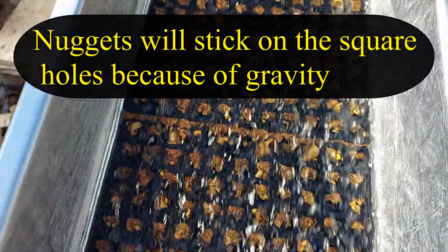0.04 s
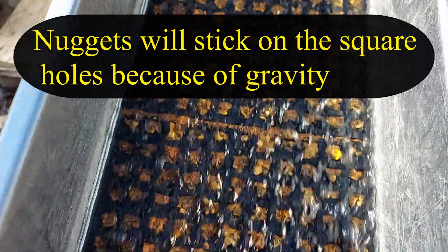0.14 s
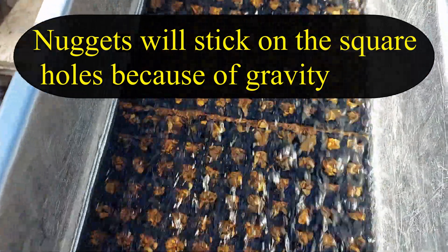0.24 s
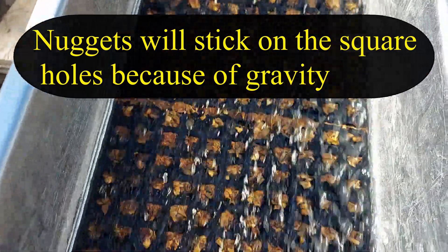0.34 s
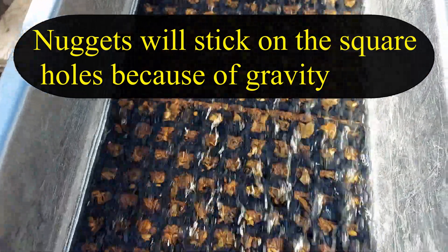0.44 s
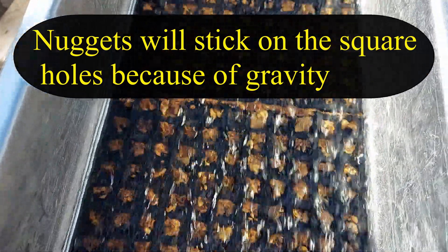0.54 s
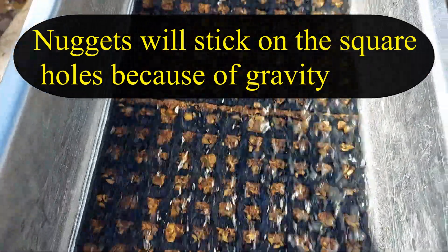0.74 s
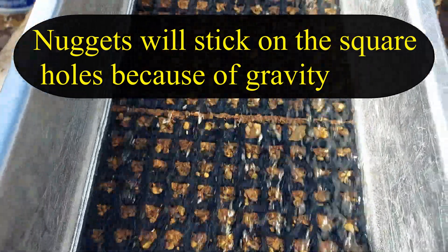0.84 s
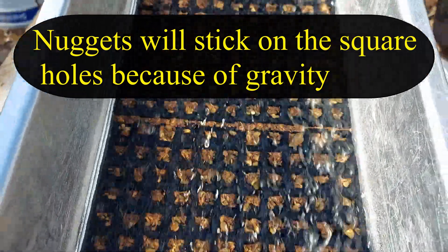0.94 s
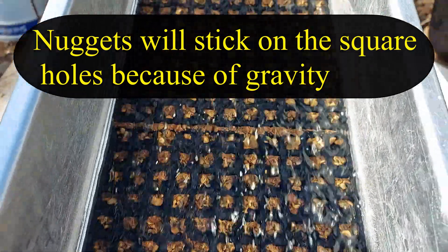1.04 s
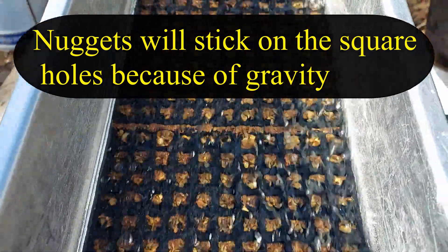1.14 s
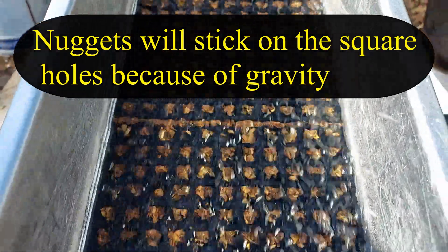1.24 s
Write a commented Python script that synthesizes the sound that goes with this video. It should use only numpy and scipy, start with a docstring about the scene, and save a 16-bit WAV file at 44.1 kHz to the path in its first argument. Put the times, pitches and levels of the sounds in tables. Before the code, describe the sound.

Running water babbles through a metal sluice outdoors, close to the microphone, with fine spray and small gurgles. Early on, the sluice takes a single dull knock, followed by a brief gravel clatter and low rattle under the continuing flow.

```python
"""One dull knock excites the damped modes of a metal sluice, which ring briefly. Grit crunches at the
contact, jolted gravel clatters, and a low rattle and a soft hiss die away. Throughout, shallow water
runs close by over the sluice's gravel-filled mat: a mass of small resonating bubbles, fine spray,
brief splashes and a few larger gurgles."""
import sys
import numpy as np
from scipy import signal
from scipy.fft import rfft, irfft
from scipy.io import wavfile
from scipy.ndimage import uniform_filter1d

SR = 44100
rng = np.random.default_rng(int(sys.argv[2]) if len(sys.argv) > 2 else 0)


def transcribe(u):
    """Save the signal u as a 16-bit wav file named by the first command-line argument.

    u: samples, shape (n,) or (channels, n), limited to [-1, 1]; the rate is SR.
    q: integer samples, one column per channel.
    """
    v = np.clip(np.atleast_2d(u).T, -1, 1)
    q = np.round(v * 32767).astype(np.int16)
    wavfile.write(sys.argv[1], SR, q)


N = 57330

# Strength of the flow. Each row: time in seconds, gain of the babble in dB.
FLOW_LEVEL = [(0, 0), (.13, 0.5), (.23, 1.5), (.36, 4.5), (.46, 1), (.52, -2.5), (.6, 1), (.68, -2),
              (.71, 2), (.76, -4), (.81, -2.5), (.9, -2), (1.02, -0.5), (1.08, -0.5), (1.16, 1.5),
              (1.24, 1), (1.3, -0.5)]
# Strength of the water's treble. Each row: time in seconds, gain in dB.
FIZZ_LEVEL = [(0, 0.5), (.2, 1.5), (.46, 2.5), (.54, 1.5), (.7, -.5), (.77, -2), (.9, -1.5), (1.05, 0),
              (1.19, -1), (1.3, -2)]
# Shift of the fizz from right to middle. Each row: time in seconds, added left minus right in dB.
FIZZ_PAN = [(0, 1.5), (.45, 0.5), (.6, 3.7), (.9, 4.2), (1.3, 4.2)]
# Running water. Each row: frequency in Hz, relative spectral density in dB.
WATER_SPECTRUM = [(25, -36), (50, -21), (90, -6.5), (130, -10.5), (200, -11), (270, -5.5), (410, -5.5),
                  (590, -8), (760, -3.5), (850, -0.5), (950, -4.5), (1250, -3), (1750, -1.5), (2700, -11),
                  (4100, -10), (5200, -15.5), (7900, -16), (9400, -22), (12000, -18.5), (16000, -24.5)]
# Direction of the water. Each row: frequency in Hz, left minus right in dB.
WATER_BALANCE = [(100, 1.5), (500, 3.5), (1200, 3), (1550, 2.5), (2400, -1.5), (4500, -4), (7700, -7),
                 (9500, 1.5), (12000, 2), (15000, -3)]
# Likeness of the two sides. Each row: frequency in Hz, correlation from -1 to 1.
STEREO_CORRELATION = [(100, .9), (800, 0.77), (1150, 0.42), (1550, -0.24), (2300, 0.21), (6000, -0.11)]
# Larger bubbles. Each row: start in seconds, initial pitch in Hz, level in dB, T60 in seconds.
GURGLE_BUBBLES = [(.015, 868, -37, 0.15), (.018, 1680, -32, 0.071), (.12, 1182, -26, 0.078),
                  (0.451, 430, -32.5, 0.068), (.455, 880, -31, 0.066), (0.475, 256, -38, 0.14),
                  (0.633, 340, -37, 0.034), (.653, 826, -29, 0.031), (.698, 808, -33.5, 0.041),
                  (.734, 840, -29.5, 0.023), (.799, 395, -27.5, 0.043), (.892, 268, -34.5, 0.1),
                  (.96, 860, -35, 0.093), (1.052, 1434, -35, 0.12), (1.106, 349, -29, 0.039),
                  (1.162, 1127, -29, 0.041), (1.169, 197, -42, 0.074), (1.272, 830, -36, 0.2)]
# Splashes over the riffles. Each row: peak time in seconds, centre in Hz, level in dB, width in seconds.
SPLASH_BURSTS = [(0.026, 2240, -37, 0.011), (.193, 6200, -39, 0.018), (0.462, 3840, -35.5, 0.015),
                 (.635, 4570, -45, 0.017), (0.706, 1400, -37, 0.015), (0.897, 844, -38, 0.012),
                 (1.003, 7240, -47, .025), (1.194, 4400, -40.5, 0.023), (1.284, 550, -42, 0.019)]
# Hiss after the knock. Each row: frequency in Hz, relative spectral density in dB.
HISS_SPECTRUM = [(500, 1.5), (2500, -16), (3500, 3), (4150, 0.5), (5000, 1.5), (8300, -2.5), (10000, -7.5),
                 (16000, -14)]
# Envelope of that hiss. Each row: time in seconds, level in dB.
HISS_ENVELOPE = [(.24, -75), (.27, -35), (.33, -41.5), (.42, -41), (.463, -49), (.48, -55), (.54, -66)]
# Jolted gravel. Each row: frequency in Hz, relative spectral density in dB.
CLATTER_SPECTRUM = [(150, -22), (400, -2), (750, -2), (1300, -7), (2200, -7), (5000, -35), (12000, -40)]
# Cracking grit. Each row: frequency in Hz, relative spectral density in dB.
CRUNCH_SPECTRUM = [(60, -25), (400, 4), (900, 0), (1700, 8.5), (2700, -7), (4000, 2.5), (7400, 4.5),
                   (9200, -2), (11000, 3), (15500, -7)]
# Direction of the crunch. Each row: frequency in Hz, left minus right in dB.
CRUNCH_PAN = [(800, 19), (2500, -2), (5500, -4.5), (8000, -12), (10000, 8), (15000, -9)]
# Rattling tail of the knock. Each row: frequency in Hz, relative spectral density in dB.
RATTLE_SPECTRUM = [(25, -22), (60, 1), (180, 11.5), (290, 5.5), (500, 8), (800, -0.5), (1200, -36),
                   (4000, -24)]
# Contacts of the knock. Each row: start in seconds, strength in dB.
CONTACTS = [(.2438, 0), (.2505, -2.1)]
# Modes of the loaded sluice. Each row: frequency in Hz, level in dB, T60 in seconds.
SLUICE_MODES = [(63, -35, .41), (112, -32.5, .19), (180, -18.2, .2), (221, -17, .44), (256, -20.6, .37),
                (346, -12, .09), (388, -17.5, .2), (424, -23, .16), (526, -10, .32), (605, -6.9, .015),
                (720, -19.7, .1), (835, -23.5, .14), (1222, -28, .075)]

BUBBLES_PER_S, BUBBLE_CYCLES, BUBBLE_SPREAD_DB = 3000, 37.5, 2.5
BUBBLE_RISE = 0.056  # fractional rise in pitch over one T60
KNOCK_PAN_DB, CONTACT_RISE_S = 4, 0.00017


def undb(db):
    """Amplitude grows tenfold for every 20 dB."""
    return 10 ** (np.asarray(db) / 20)


def unit(x):
    """Normalisation to an rms of 1."""
    return x / np.sqrt(np.mean(x ** 2))


def curve(rows):
    """Linear interpolation of (seconds, value) rows."""
    return np.interp(np.arange(N) / SR, *np.array(rows).T)


def bin_hz():
    """Frequencies of the Fourier bins, floored at 1 Hz."""
    return np.maximum(np.arange(N // 2 + 1) * SR / N, 1)


def across(rows):
    """Interpolation of (Hz, value) rows in log frequency."""
    hz, value = np.array(rows).T
    return np.interp(np.log(bin_hz()), np.log(hz), value)


def colour(x, rows):
    """Spectral shaping by (Hz, dB) rows, to an rms of 1."""
    return unit(irfft(rfft(x) * undb(across(rows)), N))


def pan(db):
    """Left and right gains: a level difference gives direction."""
    return undb(np.array([np.atleast_1d(db), -np.atleast_1d(db)]) / 2)


def spread(pair):
    """Mid-side mixing makes two independent sounds alike in the bass and leaves the treble apart."""
    correlation = across(STEREO_CORRELATION)
    mid, side = rfft(pair) * np.sqrt([1 + correlation, 1 - correlation])
    return irfft(np.array([mid + side, mid - side]), N)


def stereo_noise():
    """White noise with partial coherence between the sides."""
    return spread(rng.standard_normal((2, N)))


def flicker(hz):
    """Twice-averaged noise fluctuates at rates below hz, with an rms of 1."""
    width = int(SR / hz)
    return unit(uniform_filter1d(uniform_filter1d(rng.standard_normal(N), width), width))


def fade(age, t60):
    """Exponential decay, 60 dB in t60 seconds."""
    return np.exp(-np.log(1000) * np.maximum(age, 0) / t60)


def since(start):
    """Seconds since an onset, zero before it."""
    return np.maximum(np.arange(N) / SR - start, 0)


def bubble(age, hz, t60):
    """A bubble is a damped oscillator whose pitch rises as it nears the surface."""
    return np.sin(2 * np.pi * hz * age * (1 + BUBBLE_RISE * age / t60 / 2)) * fade(age, t60)


def bubble_stream():
    """Superposition of many random bubbles of all sizes gives an even spectrum."""
    stream = np.zeros(N)
    for when, smallness, force, ring in rng.random((int(BUBBLES_PER_S * N / SR), 4)):
        hz = (14 + 112 * smallness) ** 2
        t60 = BUBBLE_CYCLES * (.5 + ring) / hz
        start = int(when * N)
        age = np.arange(min(int(t60 * SR), N - start)) / SR
        strength = undb(-BUBBLE_SPREAD_DB * np.log(1 - .98 * force))
        stream[start:start + len(age)] += strength * hz ** .75 * bubble(age, hz, t60)
    return unit(stream)


def water(level_db=-35, spray_db=3, flicker_db=0.93, crossover_hz=2450):
    """Bubble resonance and spray noise form a low babble that follows the flow and a separate fizz."""
    spray = rng.standard_normal((2, N)) * undb(spray_db)
    bubbles = np.array([bubble_stream(), bubble_stream()])
    stream = spread(bubbles + spray) * undb(flicker_db * flicker(hz=45))
    spectrum = rfft(colour(stream, WATER_SPECTRUM)) * pan(across(WATER_BALANCE))
    lowpass = 1 / (1 + (bin_hz() / crossover_hz) ** 4)
    babble = irfft(spectrum * lowpass, N) * undb(curve(FLOW_LEVEL))
    fizz = irfft(spectrum * (1 - lowpass), N) * undb(curve(FIZZ_LEVEL)) * pan(curve(FIZZ_PAN))
    return undb(level_db) * (babble + fizz)


def gurgles(rise_s=0.0022):
    """Single larger bubbles resonate above the stream."""
    sound = 0
    for start, hz, db, t60 in GURGLE_BUBBLES:
        age = since(start)
        sound += undb(db) * bubble(age, hz, t60) * np.minimum(age / rise_s, 1)
    return sound * pan(db=3)


def splashes(width_octaves=0.45):
    """Droplets add up to bursts of band noise, Gaussian in time and in log frequency."""
    sound = 0
    for peak_s, hz, db, width_s in SPLASH_BURSTS:
        band = np.exp(-.5 * (np.log2(bin_hz() / hz) / width_octaves) ** 2)
        drops = unit(irfft(rfft(stereo_noise()) * band, N))
        envelope = np.exp(-2 * ((np.arange(N) / SR - peak_s) / width_s) ** 2)
        sound += drops * undb(db) * envelope
    return sound


def hiss(grain_db=2.2):
    """Random amplitude modulation makes a grainy hiss, as of shaken gravel settling."""
    grains = rng.standard_normal((2, N)) * undb(grain_db * flicker(hz=300))
    return colour(grains, HISS_SPECTRUM) * undb(curve(HISS_ENVELOPE)) * pan(db=-4.5)


def clatter(start_s=.262, level_db=-24, rise_s=.002):
    """Jolted gravel falls back into the mat; its impacts merge into one decaying noise burst."""
    age = since(start_s)
    stones = colour(stereo_noise(), CLATTER_SPECTRUM) * undb(level_db)
    return stones * np.minimum(age / rise_s, 1) * fade(age, t60=.07) * pan(KNOCK_PAN_DB)


def crunch(start_s=.2445, level_db=-19.5, grain_db=2, hold_s=0.0032):
    """Grit cracking at the contact radiates a short broadband transient."""
    age = since(start_s)
    grit = colour(stereo_noise(), CRUNCH_SPECTRUM) * undb(level_db + grain_db * flicker(hz=1220))
    burst = grit * (1 - np.exp(-age / CONTACT_RISE_S)) * fade(age - hold_s, t60=0.045)
    return irfft(rfft(burst) * pan(across(CRUNCH_PAN)), N)


def rattle(level_db=-28.5, rise_s=0.0064):
    """The shaken sluice gives a low noise that decays exponentially from the first contact."""
    age = since(CONTACTS[0][0])
    shaking = colour(stereo_noise(), RATTLE_SPECTRUM) * undb(level_db)
    return shaking * np.minimum(age / rise_s, 1) * fade(age, t60=0.63) * pan(KNOCK_PAN_DB)


def knock():
    """Two quick contacts excite the sluice's damped modes, neighbouring modes in opposite sense."""
    ring = 0
    for start, contact_db in CONTACTS:
        age = since(start)
        onset = undb(contact_db) * (1 - np.exp(-age / CONTACT_RISE_S))
        for k, (hz, db, t60) in enumerate(SLUICE_MODES):
            mode = undb(db) * np.sin(2 * np.pi * hz * age) * fade(age, t60)
            ring += (-1) ** k * onset * mode
    return ring * pan(KNOCK_PAN_DB)


def scene():
    """The pressures of the running water and of the knock add by superposition."""
    return water() + gurgles() + splashes() + hiss() + clatter() + crunch() + rattle() + knock()


def record(dry):
    """A steep elliptic low-pass filter removes the highest treble."""
    cutoff_hz = 15900
    return signal.sosfilt(signal.ellip(10, .2, 80, cutoff_hz, fs=SR, output="sos"), dry)


dry = scene()
out = record(dry)
transcribe(out)
```